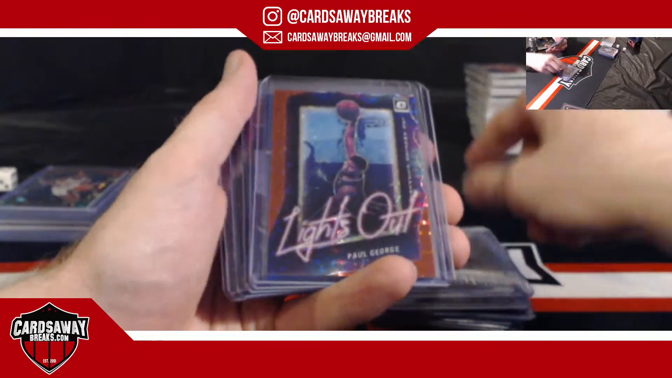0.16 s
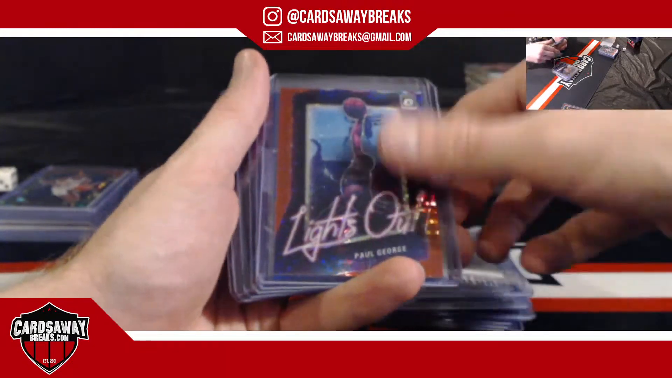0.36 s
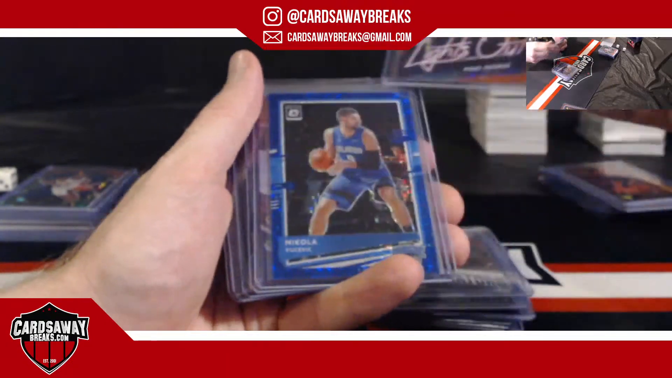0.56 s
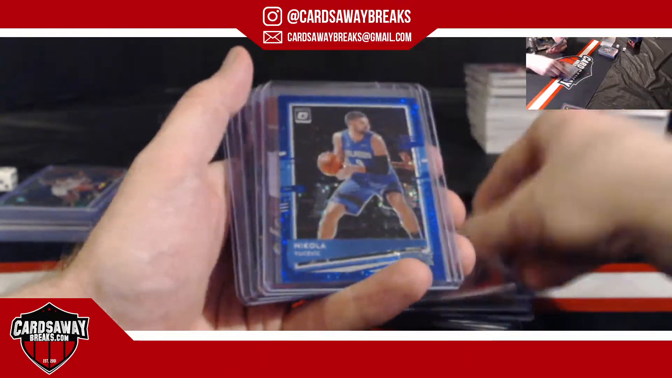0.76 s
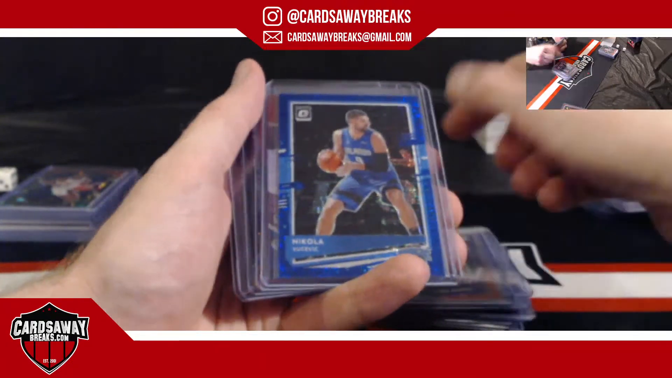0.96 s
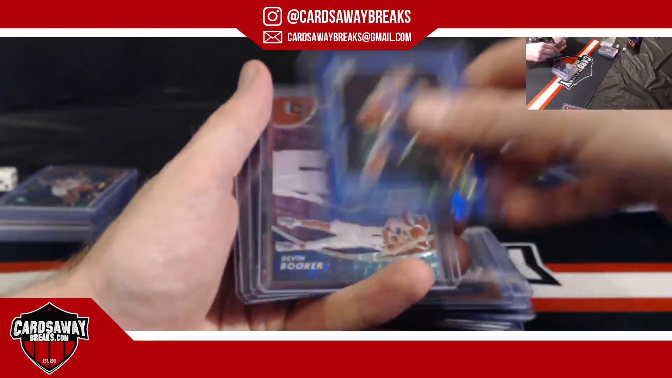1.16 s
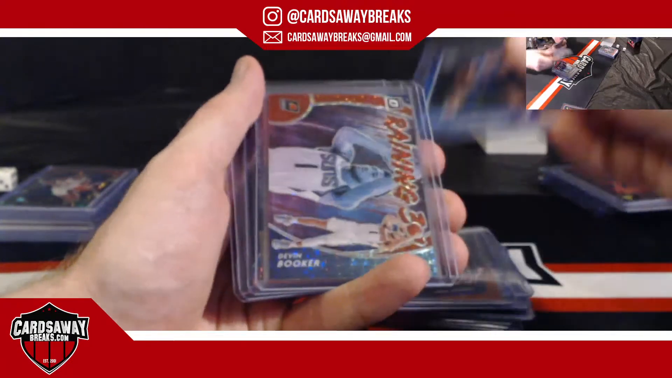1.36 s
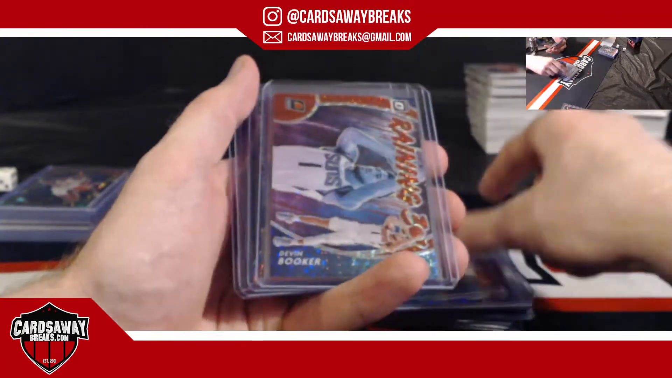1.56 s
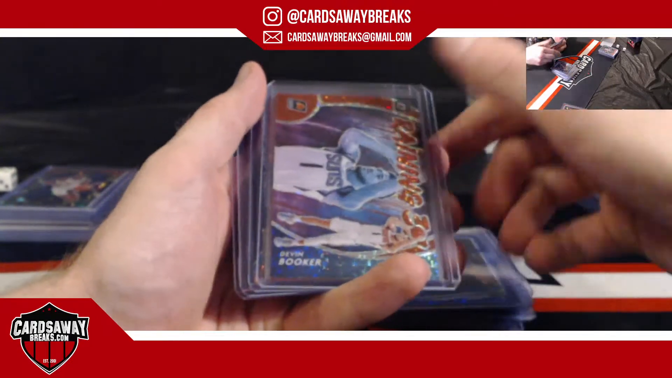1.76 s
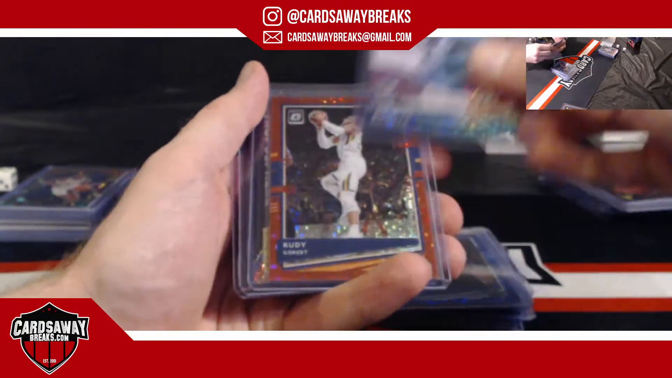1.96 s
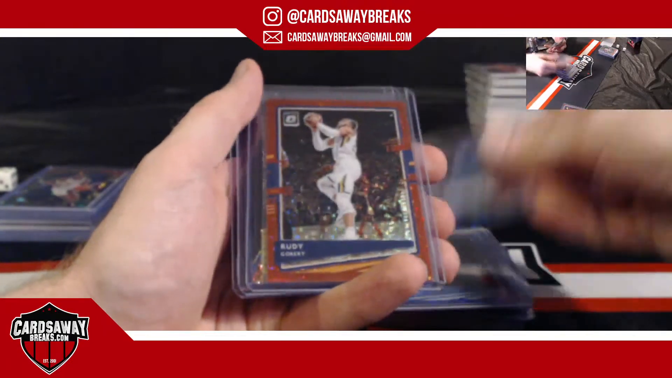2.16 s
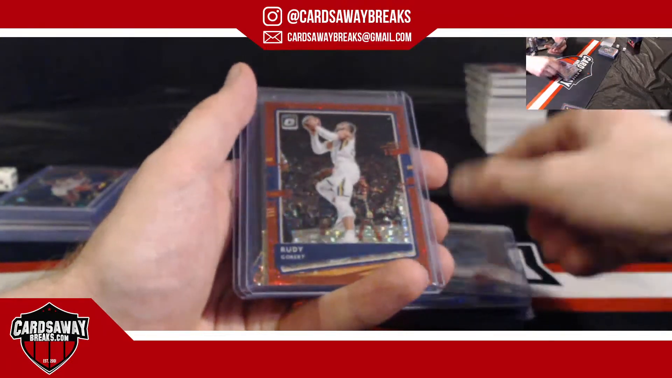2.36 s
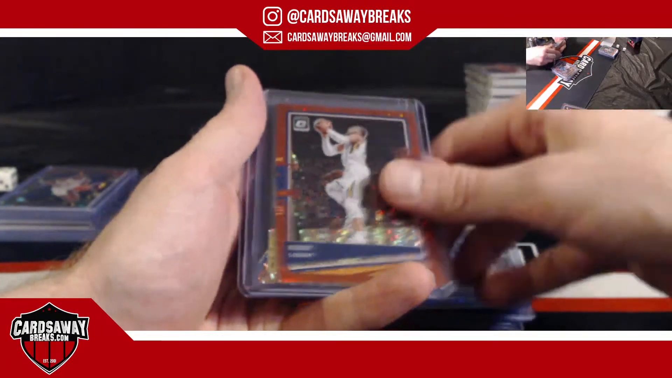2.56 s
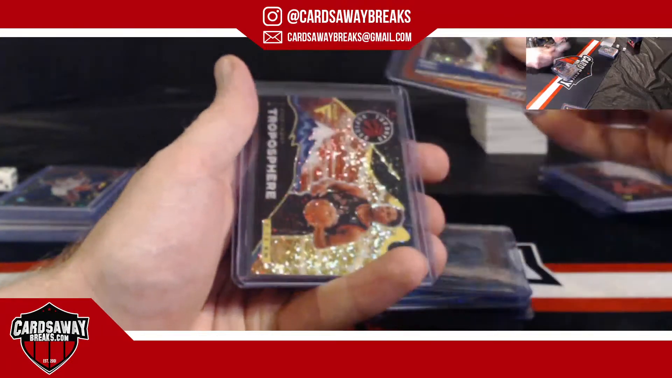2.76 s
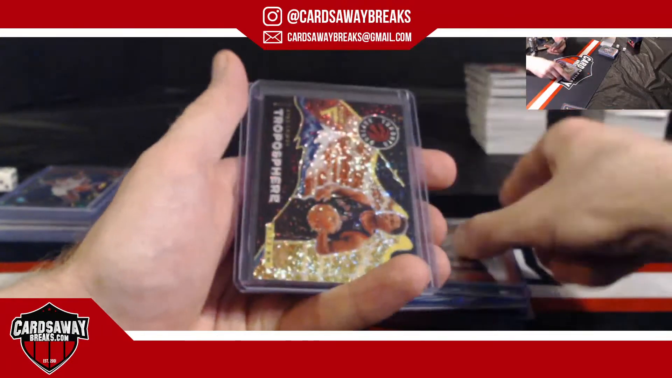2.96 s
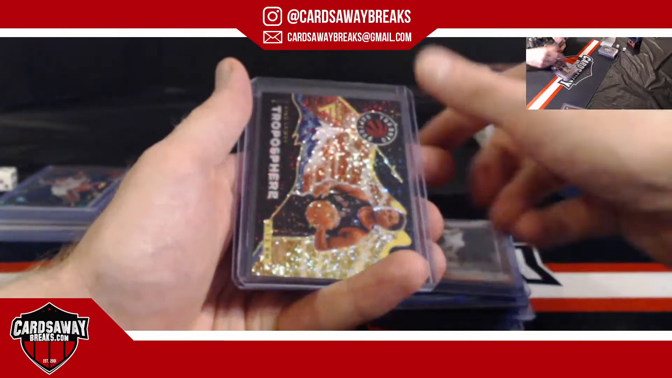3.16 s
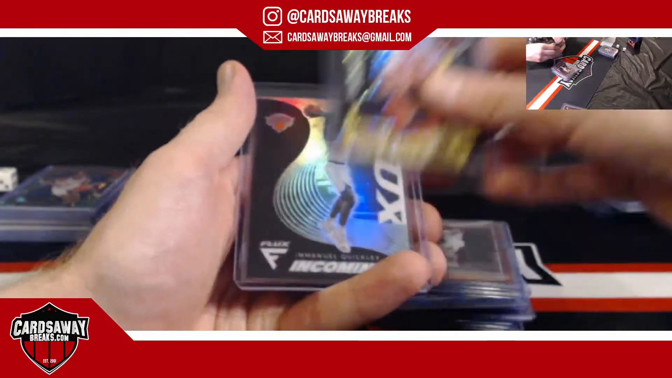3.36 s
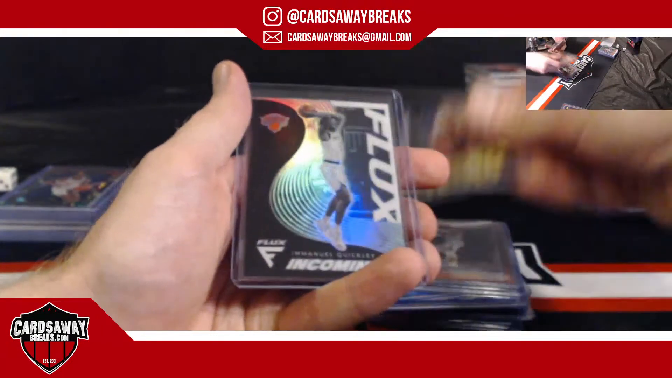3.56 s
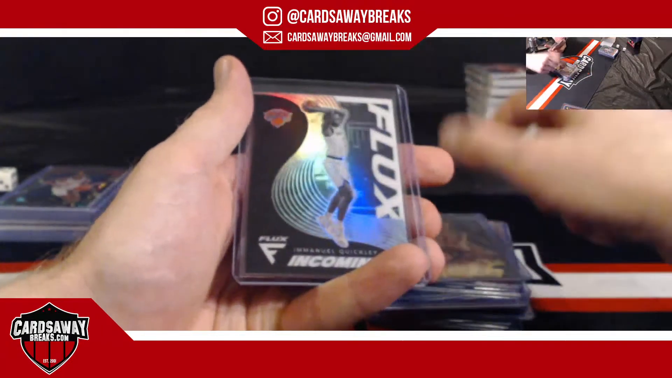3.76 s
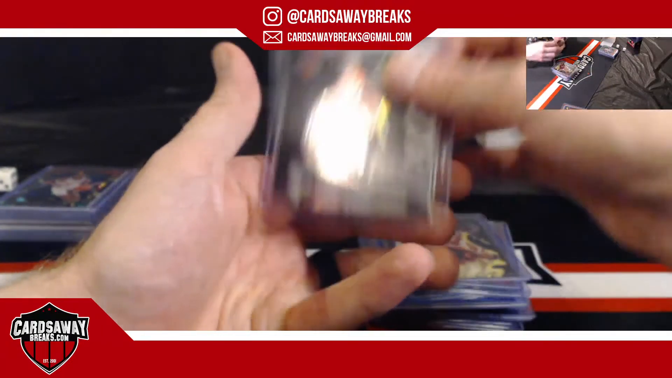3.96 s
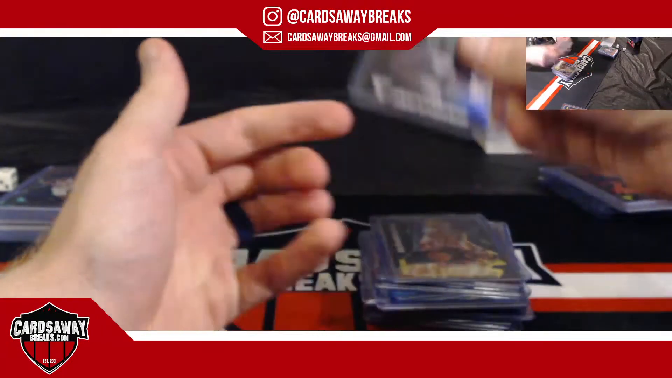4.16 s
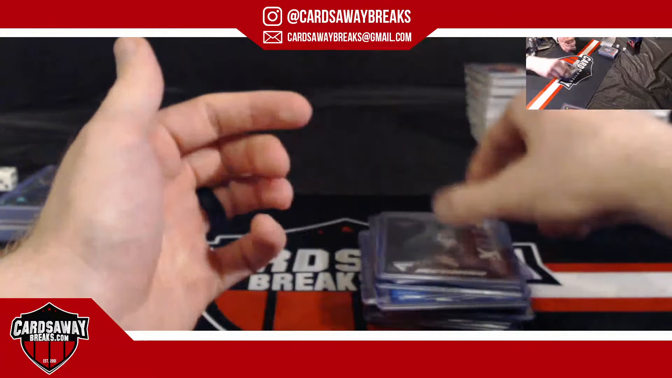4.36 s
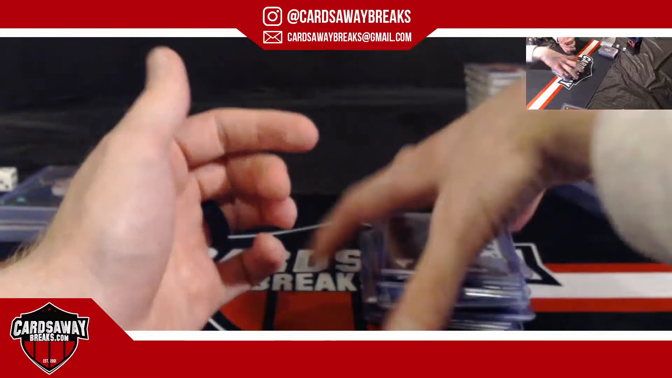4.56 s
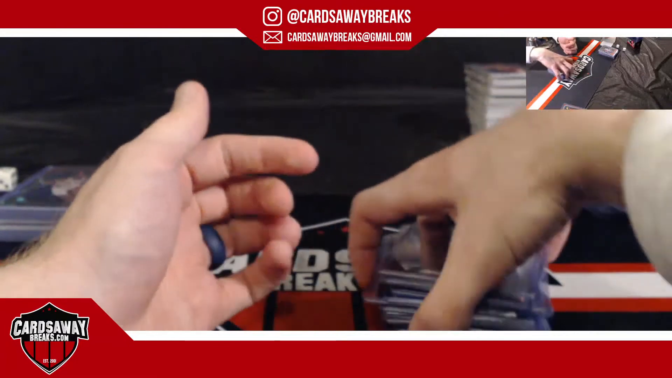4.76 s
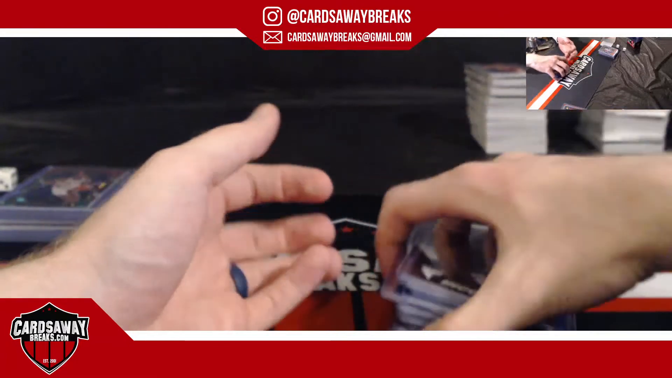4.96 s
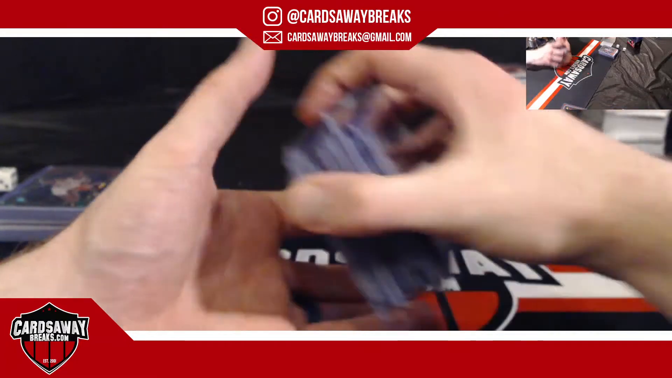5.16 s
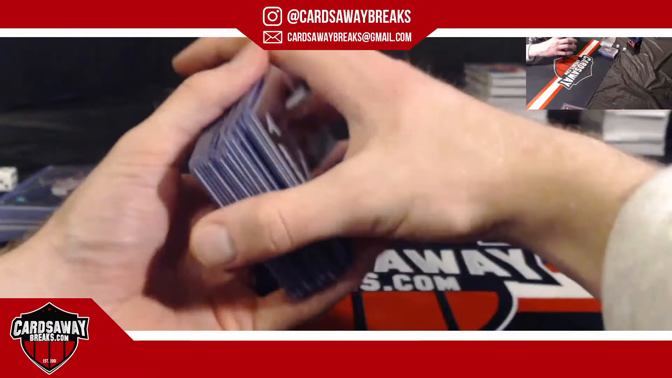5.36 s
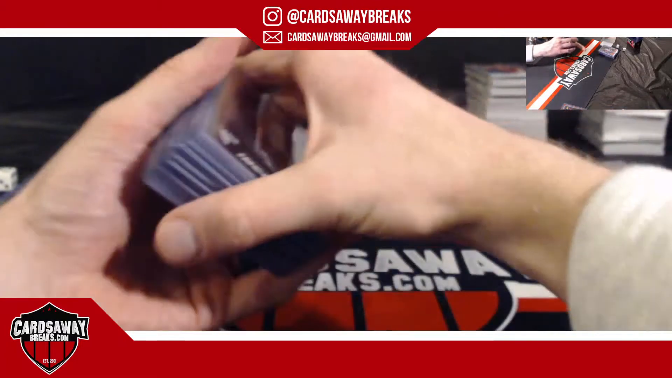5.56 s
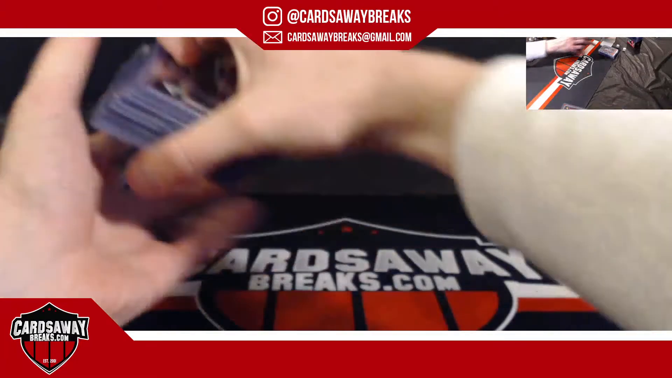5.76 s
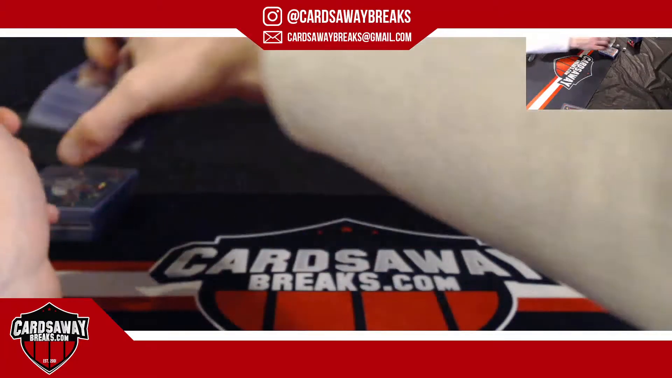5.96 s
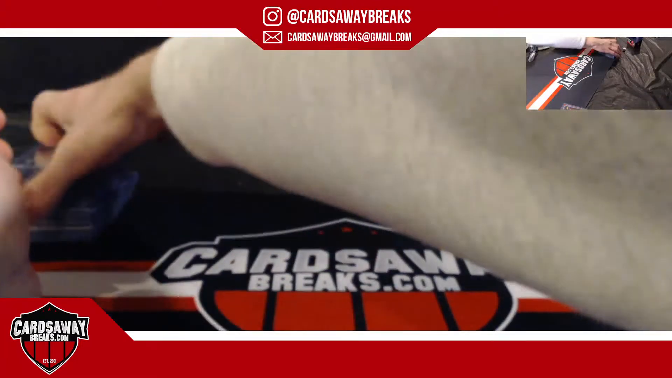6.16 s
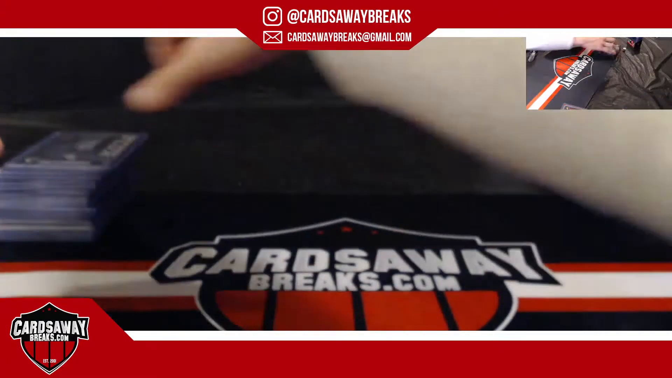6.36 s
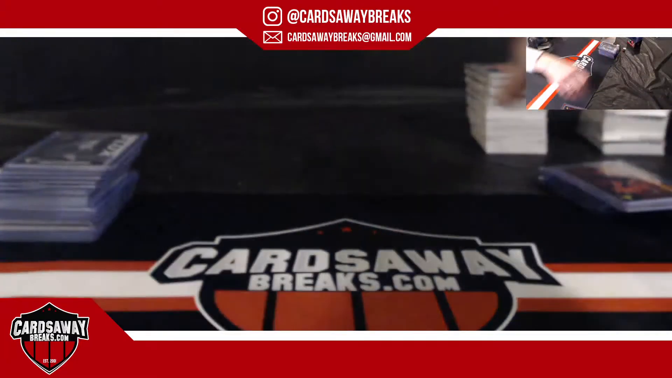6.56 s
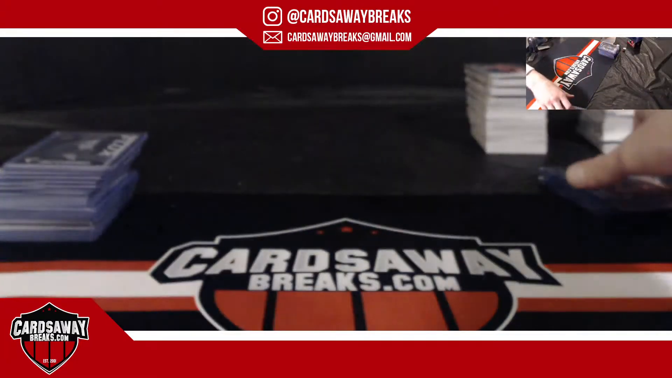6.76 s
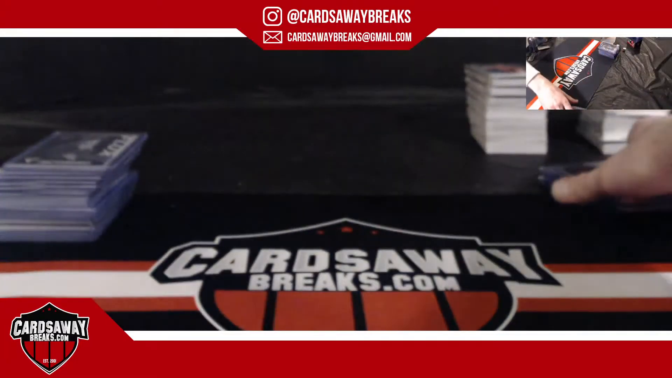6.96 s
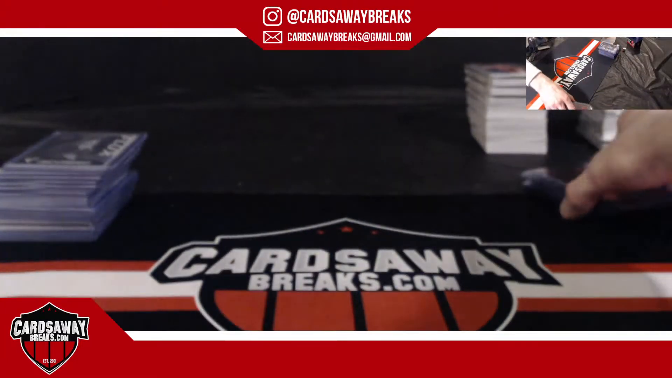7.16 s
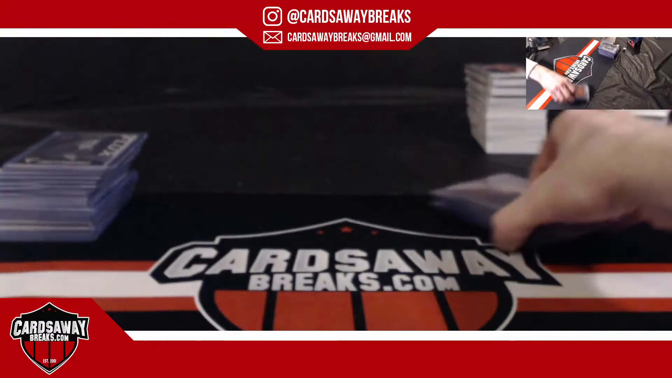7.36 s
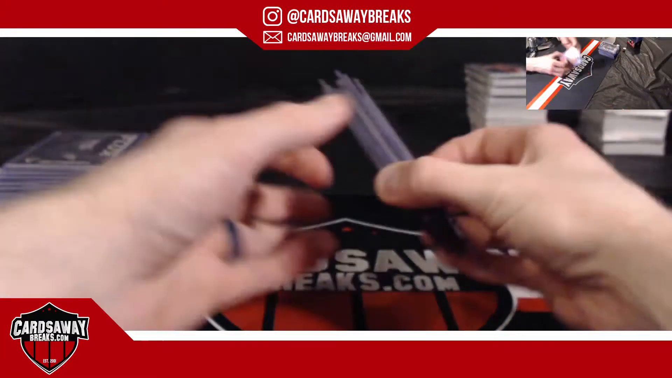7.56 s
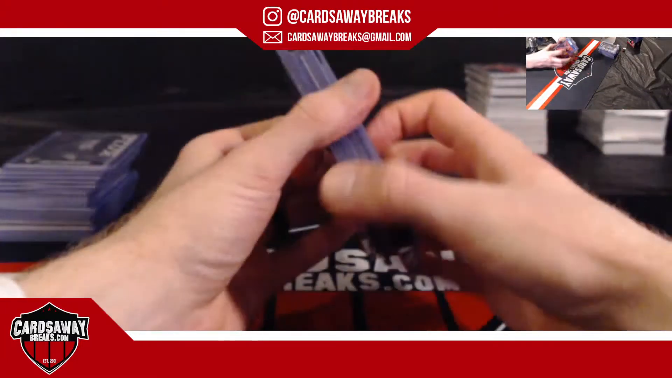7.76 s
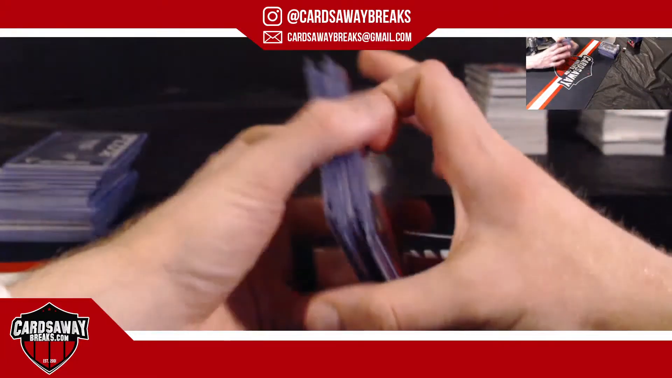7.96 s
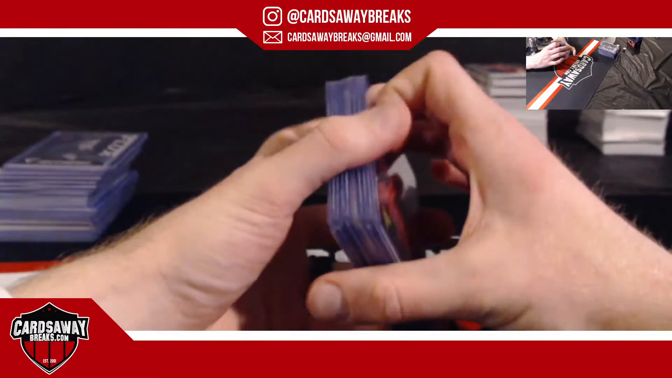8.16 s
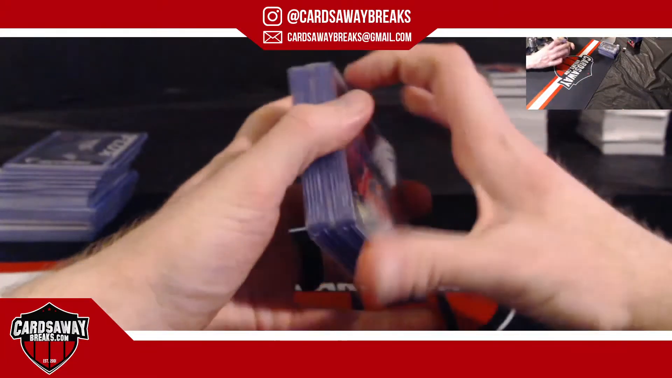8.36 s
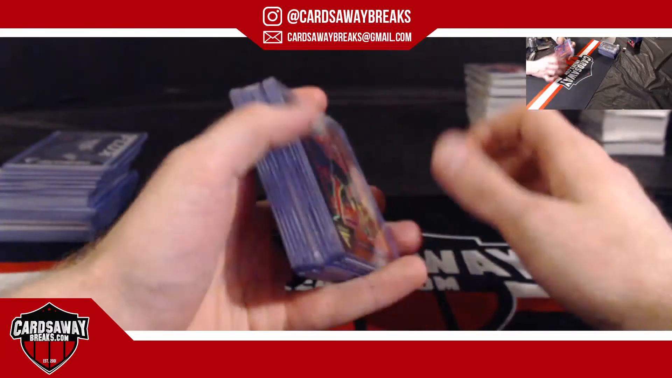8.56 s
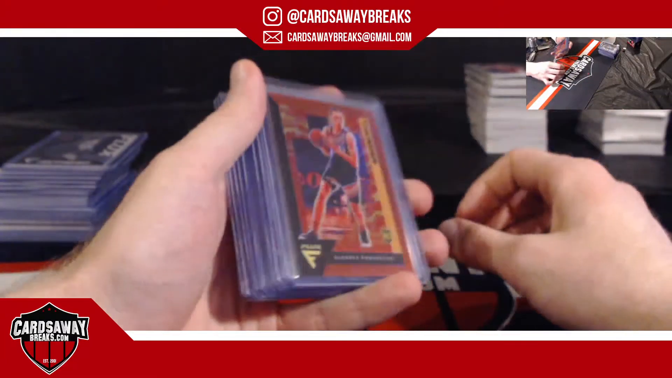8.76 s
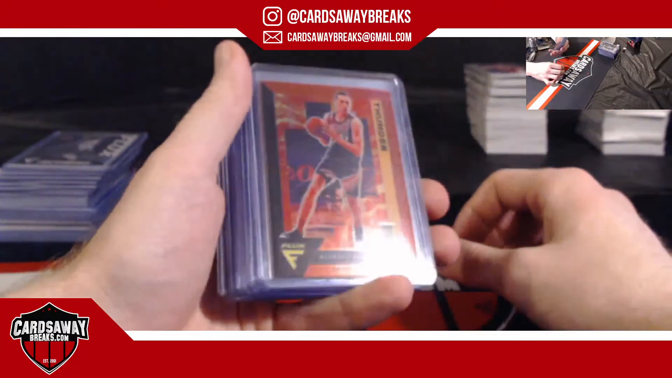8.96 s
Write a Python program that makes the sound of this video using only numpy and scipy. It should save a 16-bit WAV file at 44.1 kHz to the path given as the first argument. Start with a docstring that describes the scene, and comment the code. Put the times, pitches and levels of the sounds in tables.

```python
"""A small room hums quietly throughout, and a close microphone hears a padded desk.
First, cards in stiff plastic holders are dealt from one hand onto a pile: each slides off in grainy friction,
ticks against the pile in a flurry of tiny contacts and drops with a soft, damped low thump.
Then the pile is gathered and put down with a knock, a dense burst of dull noise that rings the desk.
Last, a second pile is dragged over and squared up in faint scrapes and ticks, while sleeves hiss softly."""
import sys
import numpy as np
from scipy import signal
from scipy.fft import rfft, irfft
from scipy.io import wavfile
from scipy.ndimage import uniform_filter1d

SR = 44100
rng = np.random.default_rng(int(sys.argv[2]) if len(sys.argv) > 2 else 0)


def master_out(mix):
    """Clip the mix to full scale and print it as 16-bit PCM to the path in sys.argv[1]."""
    frames = np.transpose(np.atleast_2d(mix))
    ceiling = np.clip(frames, -1, 1)
    pcm = np.round(ceiling * 32767).astype(np.int16)
    wavfile.write(sys.argv[1], SR, pcm)


N = 400869  # length in samples

# All levels are in dB before each source's own trim. Tilts count octaves of (frequency + 1 kHz).

# The room's steady noise. Each row: frequency in Hz, relative density in dB per Hz.
AIR_COLOUR = [(12, -32.5), (22, 5), (32, -6.5), (47, 2.5), (65, -6.5), (134, -13.5), (210, -12),
              (357, -22.5), (660, -28), (760, -25.5), (880, -34.5), (1400, -39), (2200, -45), (4400, -47.5),
              (16000, -54.5)]
AIR_DB = -57.5
# Faint hum lines. Each row: frequency in Hz, rms level in dB.
HUM_LINES = [(183, -77.5), (750, -84), (1001, -90), (2003, -95.5), (2998, -99)]
# The lowest noise swells and ebbs.
RUMBLE_SWELL_DB, RUMBLE_SWELL_S, RUMBLE_TOP_HZ = 3, .12, 117
# How fast the room's tail dies. Each row: frequency in Hz, t60 in seconds.
TAIL_DECAY = [(100, .4), (400, .28), (1000, .24), (3500, .27), (8000, .25), (15000, .21)]
# The tail's colour. Each row: frequency in Hz, level in dB.
TAIL_COLOUR = [(60, 1), (300, -7.5), (700, -5.5), (1600, -14.5), (2800, -2.5), (4200, -8.5), (8000, -9.5),
               (15000, -15)]
# Reflections from near surfaces. Each row: delay in seconds, level in dB.
ECHOES = [(.0023, -23.5), (.0094, -14), (0.011, -32), (0.0114, -17), (0.02, -19)]
BASS_CUT_HZ, BAND_LIMIT_HZ = 14, 16200

# The colour of sleeve and skin. Each row: frequency in Hz, relative level in dB.
CLOTH_COLOUR = [(200, -10), (1500, 1.5), (4000, -1), (10000, -3), (13000, -6), (16000, -16)]
# An arm sweeps past, swelling and fading. Each row: start in seconds, end in seconds, level in dB.
SWEEPS = [(4.9, 6.1, -79.5), (5.7, 6.614, -75), (6.303, 8.4, -80), (7.5, 7.722, -76), (8.267, 8.784, -74.5)]

# The desk's resonances. Each row: frequency in Hz, gain in dB, t60 in seconds.
DESK_MODES = [(43.37, 18, 0.71), (63.7, 7.5, 0.55), (97.4, -2, 0.64), (115.7, 6.5, 0.29), (160.8, 5, 0.28),
              (214.5, -1.5, 0.22), (242.5, 8.5, 0.17), (300.5, 8.5, .37), (337, 4.5, 0.27),
              (377, 9.5, 0.39), (407, 5, 0.31), (469.5, 3.5, 0.32), (536, -2, .27), (617, 9, 0.15),
              (766, -2, 0.27), (810, 3, 0.24), (980, -5, 0.25), (1113, 4, 0.07), (1250, -3, .15)]
# Hands bumping the desk. Each row: time in seconds, level in dB.
BUMPS = [(3.246, -48.5), (3.344, -50), (4.552, -45), (4.62, -48.5), (5.575, -44.5), (7.901, -48.5),
         (7.973, -47), (8.699, -52.5)]
BUMP_HZ = 58.7
PUSH_DELAY_S = 0.0033  # the padding yields just after the slap
# Then the board under it answers, higher and weaker than the push.
KNOCK_RATIO, KNOCK_DB, KNOCK_DELAY_S = 1.88, -5.5, 0.00385

# The whole stack put down: time in seconds, level in dB, t60 in seconds.
STACK_LANDING = (6.098, -15.5, 0.083)
# Its dull colour. Each row: frequency in Hz, level in dB.
CLACK_COLOUR = [(60, -12), (200, 1.5), (400, 6), (650, -1), (1200, -7), (1600, -12), (2100, -33),
                (4000, -38), (16000, -60)]
# The stack rocks on its base before it lies still. Each row: delay in seconds, level in dB.
ROCKS = [(0, -1), (.04, -19), (.075, -23), (.11, -26)]

# The colour of a plastic holder. Each row: frequency in Hz, level in dB.
PLASTIC_COLOUR = [(40, -43.5), (150, 0.5), (400, -1), (650, 6.5), (1000, -2.5), (1700, 2.5), (2600, -2),
                  (4000, 2), (5400, -3.5), (7200, -1.5), (10000, -5), (12500, -15), (16000, -19.5)]
# Holders scraped over each other or dragged on the mat. Each row: start in seconds, end in seconds,
# level in dB, tilt in dB per octave, ring in Hz, ring in dB.
SLIDES = [(3.289, 3.315, -45.5, 0, 6230, 8.5), (3.3, 3.331, -51, 0, 3160, 15),
          (3.312, 3.337, -49, 1, 4620, 18), (4.594, 4.78, -66, 0, 10700, 5),
          (4.763, 4.91, -70.5, -0.5, 4800, 4), (4.685, 4.765, -71.5, -10, 900, -3),
          (4.939, 5.011, -63.5, 2.5, 7100, 5), (4.999, 5.14, -67, 0, 10300, 10),
          (5.22, 5.32, -68, -2.1, 1190, 2), (6.27, 6.377, -73, 3, 11700, 1),
          (6.81, 7.08, -79, -7.5, 2540, 9), (6.93, 7.39, -70.5, 1.5, 4680, 9.5),
          (7.273, 7.352, -72, -2, 2150, 8), (7.47, 7.67, -71.5, -1, 5500, 8.5),
          (7.945, 8.003, -67.5, 0.5, 1400, 9), (8.69, 8.75, -70, 3, 2900, 4)]
SNAGS_PER_S = 45
# Holders shifting against each other in the fingers. Each row: time in seconds, level in dB,
# tilt in dB per octave, ring in Hz, ring in dB.
TICKS = [(1.15, -36, 1, 3660, 9), (1.903, -28, 1.5, 10100, 14), (2.0753, -49.5, -5, 3040, 22),
         (2.6856, -42.5, 6, 6800, 8), (3.2672, -40, 4, 7000, 6), (3.6273, -36, -7.5, 2800, 17),
         (3.886, -27.5, 1.5, 4330, 7), (4.5524, -42.5, -6, 2100, 8), (5.2423, -41, 0.5, 1600, 14),
         (5.2596, -42, -4, 3800, 13), (5.291, -41.5, -4, 1010, 15.5), (5.3325, -32, -4, 1670, 15),
         (5.3782, -31, 0.5, 1780, 13.5), (5.4465, -44, 0, 1710, 13), (5.5185, -36, -4, 1770, 9.5),
         (5.576, -31, -2, 1890, -1), (6.2928, -33.5, -3.5, 1490, 4), (7.5946, -40, 1, 8400, 7),
         (7.8833, -39, 1, 6300, 8), (7.971, -42, -6.5, 1600, 10), (7.9805, -40, -4.5, 2620, 2),
         (8.1228, -37, -1.5, 4300, 5.5), (8.2657, -34.5, -3, 1680, 1), (8.2778, -39.5, -3, 4300, 8),
         (8.7324, -41, 5, 3380, 6)]
TICK_WEIGHT_DB = 4

# Fingers grip the top card and start to draw it off. Each row: time in seconds, level in dB,
# level of the sliding in dB, ring in Hz.
GRIPS = [(.3532, -42, -78.5, 3660), (1.085, -35, -75.5, 3830), (1.8119, -33.5, -71, 8550),
         (2.526, -34, -72, 3220), (3.239, -30, -78.5, 3400), (3.72, -50, -74.5, 5770)]
# A finger catching the rim: tilt in dB per octave, ring in dB, weight in dB.
GRIP_TONE = (-1.2, 6, 1.6)
# Face sliding on face: tilt in dB per octave, ring in dB.
RUB_TONE = (3.4, 6.5)
RUB_DELAY_S, RUB_SHARE = .015, 0.69  # the faces touch for this share of a draw
RUB_DB = -4.5  # smooth hiss between the slips, against the sliding level
# A drawn card sticks and slips in small ticks: nominal gap, level against the sliding, nominal scatter.
SLIP_GAP_S, SLIP_DB, SLIP_SCATTER_DB = .019, 30, 4
# The colour of those ticks: tilt in dB per octave, ring in dB, weight in dB.
SLIP_TONE = (1, 3.5, -9)
# The trailing edge of that card flicks free. Each row: time in seconds, level in dB, ring in Hz, ring in dB.
RELEASES = [(.574, -32, 3040, 13), (1.2455, -41.5, 3560, 8), (1.995, -42.5, 9800, 23.5),
            (2.712, -37.5, 3920, 4), (3.3998, -49, 7800, 11), (3.983, -42, 7150, 11)]
# The colour of the flick: tilt in dB per octave, weight in dB.
RELEASE_TONE = (6.1, 0)
SCUFF_S, SCUFF_DB = 0.018, -27.5  # the rim scuffs across as it comes free; level against the release

# A card's edge meets the pile first, then skids until the card falls flat. Each row: time in seconds,
# level in dB, weight under 1 kHz in dB, tilt in dB per octave, skid in dB, push on the desk in dB.
EDGES = [(.7115, -23, 8, 0.3, -51, -37.5), (1.41, -18.5, 1, 2.5, -58.5, -45.5),
         (2.1627, -20, -3, -1.5, -59, -41), (2.8534, -16.5, -7, 0, -66, -45.5),
         (3.5747, -19.5, -4, -2.5, -64, -46), (4.2072, -18, 3, 0, -64, -51)]
EDGE_RING_HZ, EDGE_RING_DB, EDGE_PUSH_HZ = 6400, 2.5, 107
SKID_S = 0.05
# The skid's colour: tilt in dB per octave, ring in Hz, ring in dB.
SKID_TONE = (-0.81, 3500, 1.8)
# A card or a stack falls flat, one end after the other. Each row: time in seconds, level in dB,
# far end's lag in seconds, far end in dB, weight under 1 kHz in dB, tilt in dB per octave, ring in Hz,
# push on the desk in dB, push in Hz, rattle in dB.
SLAPS = [(.0042, -8.5, 0.0038, -9, 1.5, -1.5, 6840, -36, 86, -43),
         (.759, -18.5, 0.0044, -25, 16.5, 1, 4380, -36, 75, -56),
         (1.455, -14, 0.0045, -13, 11.5, 3.5, 4400, -35, 72.5, -44.5),
         (2.1913, -14, 0.0099, -12.5, 5.5, -2.5, 7000, -38, 67, -39.5),
         (2.8947, -27, .008, -31.5, 18.5, -1, 6240, -33.5, 87.2, -58),
         (3.608, -18.5, .011, -27.5, -5, -8, 2800, -35.5, 72.7, -56),
         (4.2443, -21, .0101, -21.5, 15, 1.5, 1820, -38, 99, -52),
         (5.152, -32.5, .004, -39, 15.5, 2, 3700, -37.5, 71.5, -84),
         (6.0945, -11, 0.0077, -12.5, 13, -3, 1090, -21, 65, -51)]
SLAP_RING_DB = 7
RATTLE_DELAY_S, RATTLE_T60_S = .008, 0.16
# A weaker rattle than this is duller: dB per octave for each dB.
RATTLE_BRIGHT_DB, RATTLE_DULLING = -43.5, 0.48


def amp(db):
    """Decibels to a linear factor."""
    return 10 ** (np.asarray(db) / 20)


def evened(x):
    """Scale to rms 1."""
    return x / np.sqrt(np.mean(x ** 2) + 1e-20)


def read(points, hz):
    """A table's value at hz, on a log-frequency axis."""
    f, value = np.transpose(points)
    return np.interp(np.log(hz + 1), np.log(f + 1), value)


def add(mix, s, sound):
    """Lay a sound into the mix at s seconds, cut at the end."""
    part = mix[..., max(round(s * SR), 0):][..., :sound.shape[-1]]
    part += sound[..., :part.shape[-1]]


def causal(db, size=2048):
    """The most compact one-sided pulse that has the given spectrum."""
    cepstrum = irfft(np.log(amp(db)))
    cepstrum[1:size // 2] *= 2
    cepstrum[size // 2 + 1:] = 0
    return irfft(np.exp(rfft(cepstrum)))


def die_away(t, t60):
    """A decay that loses 60 dB in t60 seconds."""
    return np.exp(-np.log(1000) * t / t60)


def noise(colour):
    """Steady noise of the given colour, rms 1."""
    spectrum = rfft(rng.standard_normal(N))
    gain = amp(read(colour, np.fft.rfftfreq(N, 1 / SR)))
    return evened(irfft(spectrum * gain, N))


def air():
    """Low ventilation noise with an uneven rumble and a few faint hum lines."""
    t = np.arange(N) / SR
    hum = np.zeros(N)
    for hz, db in HUM_LINES:
        hum += amp(db) * np.sqrt(2) * np.sin(2 * np.pi * (hz * t + rng.random()))
    steady = noise(AIR_COLOUR)
    lowpass = signal.butter(2, RUMBLE_TOP_HZ, fs=SR, output="sos")
    rumble = signal.sosfiltfilt(lowpass, steady)
    window = np.hanning(round(RUMBLE_SWELL_S * SR))
    swell = evened(signal.fftconvolve(rng.standard_normal(N), window, "same"))
    uneven = steady + rumble * (amp(RUMBLE_SWELL_DB * swell) - 1)
    return amp(AIR_DB) * uneven + hum


def room(x, wet_db=-1, build_s=0.0023):
    """A few near reflections, then a short diffuse tail that dies at its own pace in each band."""
    hz, t, z = signal.stft(rng.standard_normal(SR // 2), SR, nperseg=256)
    t60 = read(TAIL_DECAY, hz)[:, None]
    even_energy = np.sqrt(2 * np.log(1000) / t60 / SR)  # a longer decay starts softer
    z = z * amp(read(TAIL_COLOUR, hz))[:, None] * die_away(t, t60) * even_energy
    response = signal.istft(z, SR, nperseg=256)[1]
    build_up = 1 - np.exp(-(np.arange(len(response)) / SR / build_s) ** 2)
    response *= amp(wet_db) * build_up
    for delay_s, db in ECHOES:
        response[round(delay_s * SR)] += amp(db)
    return signal.fftconvolve(x, response)[:N]


def sleeve(flutter_db=1.0, fade=0.65):
    """Cloth and skin hiss softly as the arms move: fluttering noise under a swell for each sweep."""
    flutter = evened(uniform_filter1d(rng.standard_normal(N), SR // 40))
    power = np.zeros(N)
    for start, end, db in SWEEPS:
        swell = signal.windows.tukey(round((end - start) * SR), fade)
        add(power, start, (amp(db) * swell) ** 2)
    return noise(CLOTH_COLOUR) * np.sqrt(power) * amp(flutter_db * flutter)


def desk(force):
    """The desk rings on after whatever lands on it, as a bank of decaying resonances."""
    t, ring = np.arange(SR) / SR, np.zeros(SR)
    for hz, db, t60 in DESK_MODES:
        rate = np.log(1000) / t60
        ring += amp(db) * 2 * rate / SR * np.exp(-rate * t) * np.sin(2 * np.pi * hz * t)
    return signal.fftconvolve(force, ring)[:N]


def pushes():
    """Every push on the desk: time in s, level in dB, pitch in Hz (lower is heavier and softer)."""
    for s, *_, db, hz, _ in SLAPS:
        yield s + PUSH_DELAY_S, db, hz
        yield s + KNOCK_DELAY_S, db + KNOCK_DB, hz * KNOCK_RATIO
    for s, *_, db in EDGES:
        yield s, db, EDGE_PUSH_HZ
    for s, db in BUMPS:
        yield s, db, BUMP_HZ


def thumps(give=4, damping=1.6, level_db=4):
    """The padded top gives under each push and springs back within a cycle or two."""
    out, t = np.zeros(N), np.arange(SR // 8) / SR
    for s, db, hz in pushes():
        cycles = hz * t
        envelope = (1 - np.exp(-give * cycles)) * np.exp(-damping * cycles)
        add(out, s, amp(db + level_db) * np.sin(2 * np.pi * cycles) * envelope)
    return out


def stack():
    """The stack lands holder upon holder in one dense, dull clack, and rocks to rest."""
    s, db, t60 = STACK_LANDING
    out, t = np.zeros(N), np.arange(SR // 3) / SR
    dull = causal(read(CLACK_COLOUR, np.fft.rfftfreq(2048, 1 / SR)))
    for delay_s, rock_db in ROCKS:
        contact_noise = rng.uniform(-1.14, 1, len(t)) * np.sqrt(3)
        force = amp(db + rock_db) * contact_noise * die_away(t, t60)
        add(out, s + delay_s, signal.fftconvolve(force, dull))
    return out


def holder(tilt_db, ring_hz, ring_db, weight_db=0, ring_width=0.11, size=2048):
    """A holder's response: hard contacts are bright, flat ones heavy, and the grip picks one ringing band."""
    hz = np.fft.rfftfreq(size, 1 / SR)
    weight = weight_db / (1 + (hz / 1100) ** 3)
    tilt = tilt_db * np.log2((hz + 1000) / 5000)
    ring = ring_db * np.exp(-((hz - ring_hz) / (ring_width * ring_hz + 200)) ** 2)
    return causal(read(PLASTIC_COLOUR, hz) + weight + tilt + ring)


def radiate(force, tilt_db, ring_hz, ring_db, weight_db=0, spread=0.24):
    """The direct sound carries the holder's full colour; the room gets a blander mix of all directions."""
    direct = signal.fftconvolve(force, holder(tilt_db, ring_hz, ring_db, weight_db))
    around = signal.fftconvolve(force, holder(tilt_db, ring_hz, spread * ring_db, spread * weight_db))
    return np.array([direct, around])


def grit(per_s, grain_db, share):
    """Tiny contacts of uneven size in a smooth hiss, rms about 1; their rate may vary in time."""
    chance = np.clip(per_s / SR, 1e-4, 1)
    signs = rng.choice([-1, 1], N)
    sizes = evened(signs * amp(grain_db * np.minimum(rng.exponential(1, N), 3)))
    catches = (rng.random(N) < chance) * sizes / np.sqrt(chance)
    return np.sqrt(share) * catches + np.sqrt(1 - share) * rng.standard_normal(N)


def rattles(contacts_per_s=2500, grain_db=3, grain_share=0.64, ring_hz=2700, ring_db=4):
    """Loose holders in the pile chatter against each other after a slap and settle."""
    touches, out = grit(contacts_per_s, grain_db, grain_share), np.zeros(N)
    t = np.arange(SR // 3) / SR
    for s, *_, db in SLAPS:
        force = touches[round(s * SR):][:len(t)] * amp(db) * die_away(t, RATTLE_T60_S)
        tilt_db = np.clip(RATTLE_DULLING * (db - RATTLE_BRIGHT_DB), -10, 2)
        add(out, s + RATTLE_DELAY_S, signal.fftconvolve(force, holder(tilt_db, ring_hz, ring_db)))
    return out


def chatter(settle_s, rise_s, smooth_hz=900, size=2048):
    """An edge touches in a brief, dying flurry of tiny contacts, even in colour."""
    t = np.arange(size) / SR
    flurry = rng.uniform(-1.065, 1, size) * np.exp(-t / settle_s) * (1 - np.exp(-t / rise_s))
    power = uniform_filter1d(abs(rfft(flurry)) ** 2, max(int(smooth_hz * size / SR), 3))
    whiten = causal(-10 * np.log10(abs(power) + 1e-9))
    return signal.fftconvolve(flurry, whiten)[:size]


def wander(x, patchy_db=3.0, patch_hz=700, patch_s=.045, size=256):
    """Pressure and contact point shift along a stroke, so its colour drifts in patches."""
    z = signal.stft(x, SR, nperseg=size)[2]
    field = uniform_filter1d(rng.standard_normal(z.shape), max(int(patch_hz * size / SR), 1), axis=0)
    field = evened(uniform_filter1d(field, max(int(patch_s * SR * 2 / size), 1), axis=1))
    return signal.istft(z * amp(patchy_db * field), SR, nperseg=size)[1][:N]


def strokes():
    """Every stroke of friction, in the columns of SLIDES: a card rubs, scuffs free, and skids onto the pile."""
    yield from SLIDES
    tilt_db, ring_db = RUB_TONE
    for (grip_s, _, db, ring_hz), (free_s, free_db, free_hz, _) in zip(GRIPS, RELEASES):
        start = grip_s + RUB_DELAY_S
        end = start + RUB_SHARE * (free_s - grip_s)
        yield start, end, db + RUB_DB, tilt_db, ring_hz, ring_db
        yield free_s - SCUFF_S / 2, free_s + SCUFF_S / 2, free_db + SCUFF_DB, tilt_db, free_hz, ring_db
    for s, *_, db, _ in EDGES:
        yield s, s + SKID_S, db, *SKID_TONE


def slides(catches_per_s=350, gentle_db=-72, grain_db=3, grain_share=0.33, snag_db=23, fade=0.41, level_db=-2):
    """Sliding plastic catches and slips, more densely in a brisk, loud stroke: (direct, into the room)."""
    rate, out = np.zeros(N), np.zeros((2, N))
    for start, end, db, *_ in strokes():
        rate[round(start * SR):round(end * SR)] = catches_per_s * amp(db - gentle_db)
    friction = wander(grit(rate, grain_db, grain_share))
    # in a slow stroke an edge snags now and then with a distinct little tick
    snags = (rng.random(N) < SNAGS_PER_S / SR) * rng.uniform(0.2, 1.3, N)
    snags = snags / np.sqrt(1 + rate / (4 * catches_per_s))
    friction = friction + amp(snag_db) * signal.oaconvolve(snags, chatter(0.00059, .0001))[:N]
    for start, end, db, tilt_db, ring_hz, ring_db in strokes():
        stroke = friction[round(start * SR):][:max(round((end - start) * SR), 64)]
        stroke = amp(db + level_db) * stroke * signal.windows.tukey(len(stroke), fade)
        add(out, start, radiate(stroke, tilt_db, ring_hz, ring_db))
    return out


def slips(count=8):
    """After each grip the card jerks along in a run of uneven ticks, each ringing a little differently."""
    tilt_db, ring_db, weight_db = SLIP_TONE
    for s, _, db, ring_hz in GRIPS:
        for late, louder, higher in rng.uniform(-1.3, 1, (count, 3)):
            s += SLIP_GAP_S * (1 + late / 2)
            level_db = db + SLIP_DB + SLIP_SCATTER_DB * louder
            yield s, level_db, tilt_db, ring_hz * 2 ** (higher / 2), ring_db, weight_db


def contacts():
    """Every strike of plastic on plastic: s, level dB, tilt dB per octave, ring Hz, ring dB, weight dB."""
    for s, db, follow_s, far_db, weight_db, tilt_db, ring_hz, *_ in SLAPS:
        yield s, db, tilt_db, ring_hz, SLAP_RING_DB, weight_db
        yield s + follow_s, far_db, tilt_db, ring_hz, SLAP_RING_DB, weight_db
    for s, db, weight_db, tilt_db, *_ in EDGES:
        yield s, db, tilt_db, EDGE_RING_HZ, EDGE_RING_DB, weight_db
    tilt_db, ring_db, weight_db = GRIP_TONE
    for s, db, _, ring_hz in GRIPS:
        yield s, db, tilt_db, ring_hz, ring_db, weight_db
    tilt_db, weight_db = RELEASE_TONE
    for s, db, ring_hz, ring_db in RELEASES:
        yield s, db, tilt_db, ring_hz, ring_db, weight_db
    for row in TICKS:
        yield *row, TICK_WEIGHT_DB
    yield from slips()


def clicks(settle_s=0.0019, rise_s=0.00019, lead_s=.0003):
    """Each contact rings the holder in its own way: (direct, into the room)."""
    out = np.zeros((2, N))
    for s, db, tilt_db, ring_hz, ring_db, weight_db in contacts():
        force = amp(db) * chatter(settle_s, rise_s)
        add(out, s - lead_s, radiate(force, tilt_db, ring_hz, ring_db, weight_db))
    return out


def scene(click_to_desk_db=-11, stack_to_desk_db=-3, thump_room_db=-4):
    """Cards, pile and desk are heard directly and through the room, over sleeves and air."""
    taps, landings, clack, pile = clicks(), thumps(), stack(), rattles()
    direct, around = taps + slides()
    boom = desk(landings + amp(click_to_desk_db) * taps[0] + amp(stack_to_desk_db) * clack)
    near = direct + pile + clack + landings + boom
    reflected = room(around + clack + amp(thump_room_db) * landings)
    return (near + reflected + sleeve() + air())[None]


def record(dry):
    """The microphone's bass roll-off and the recorder's band limit."""
    highpass = signal.butter(1, BASS_CUT_HZ, "highpass", fs=SR, output="sos")
    lean = signal.sosfilt(highpass, dry)
    band_limit = signal.firwin(255, BAND_LIMIT_HZ, window=("kaiser", 8), fs=SR)
    return signal.oaconvolve(lean, band_limit[None], "same")


dry = scene()
out = record(dry)
master_out(out)
```